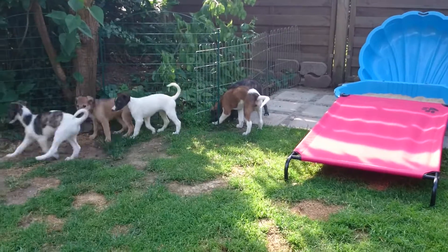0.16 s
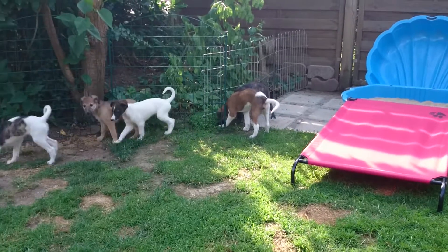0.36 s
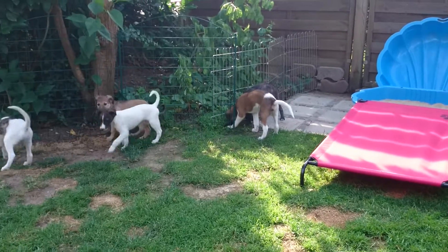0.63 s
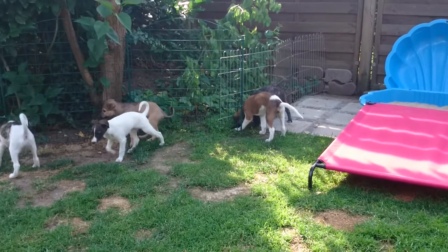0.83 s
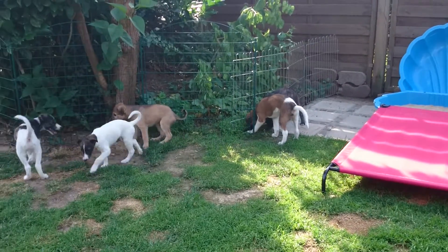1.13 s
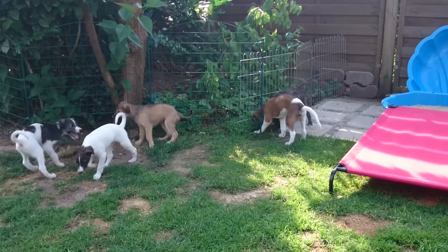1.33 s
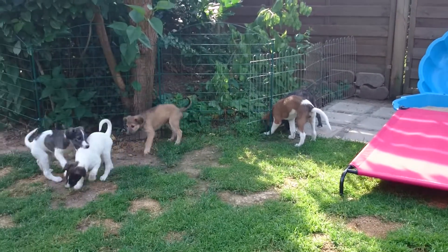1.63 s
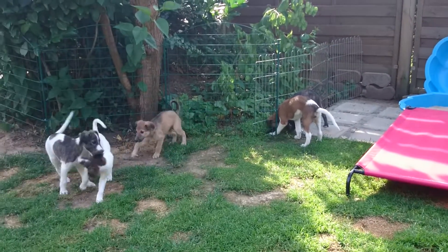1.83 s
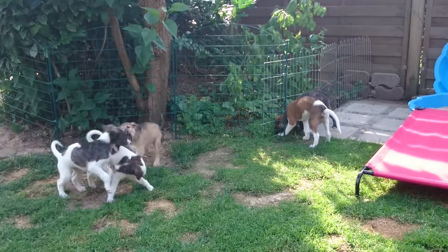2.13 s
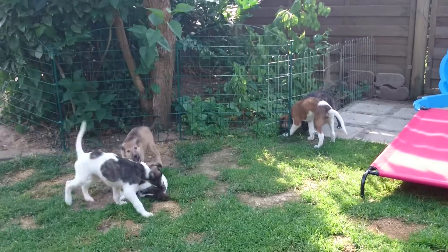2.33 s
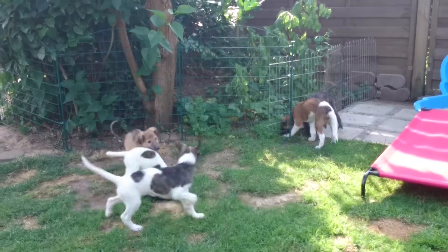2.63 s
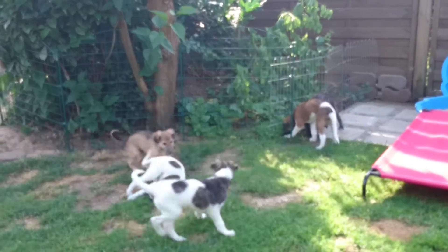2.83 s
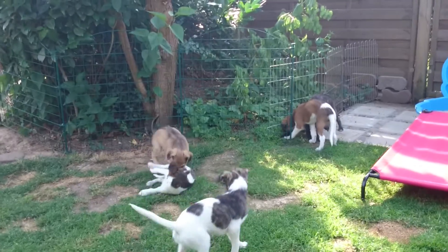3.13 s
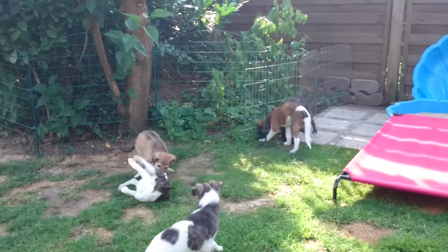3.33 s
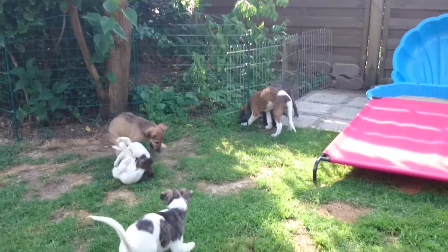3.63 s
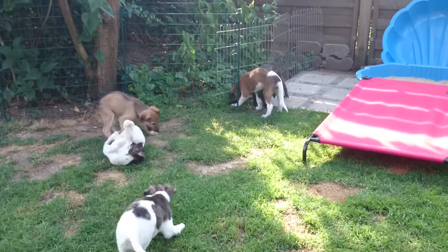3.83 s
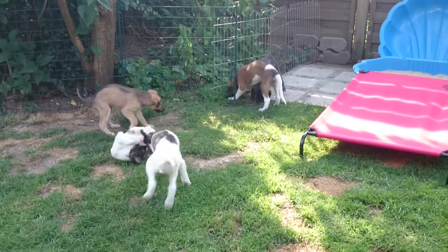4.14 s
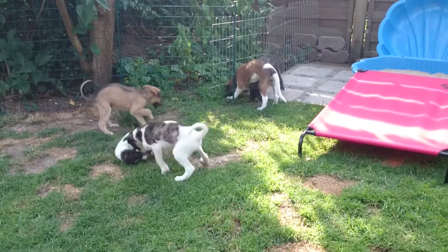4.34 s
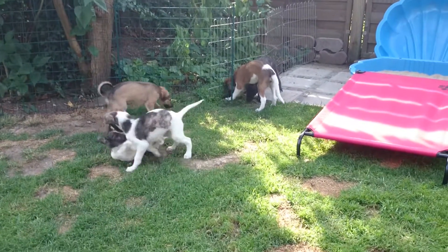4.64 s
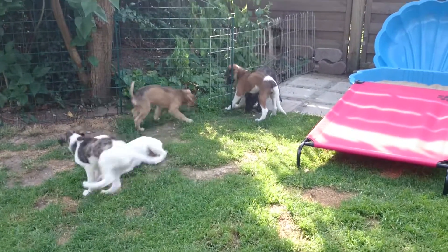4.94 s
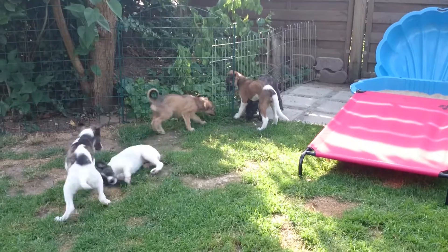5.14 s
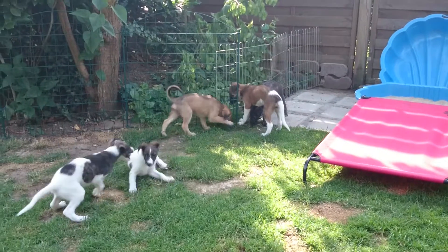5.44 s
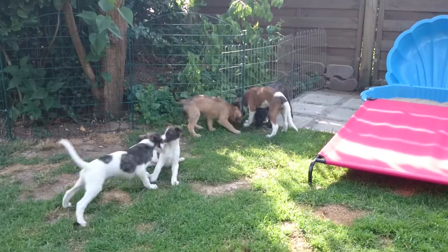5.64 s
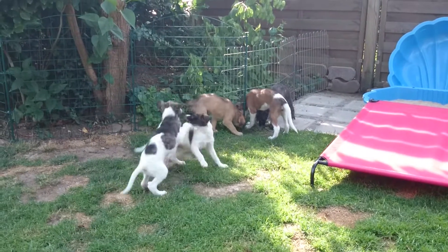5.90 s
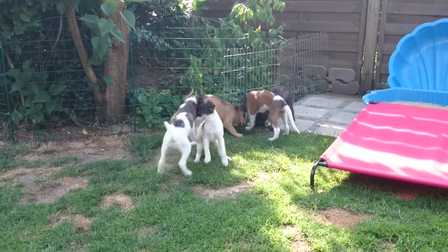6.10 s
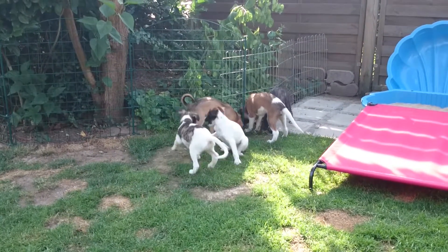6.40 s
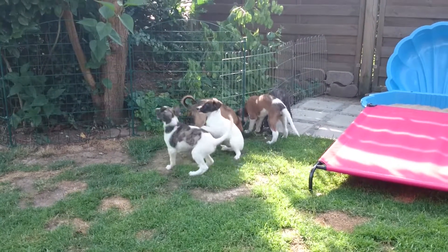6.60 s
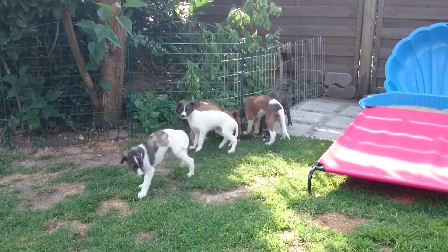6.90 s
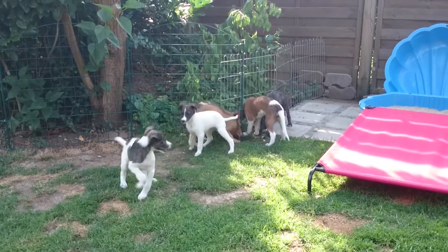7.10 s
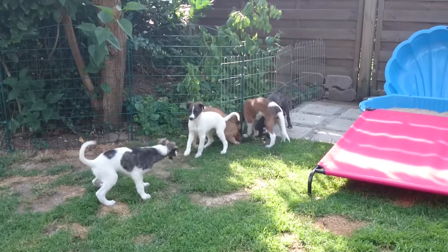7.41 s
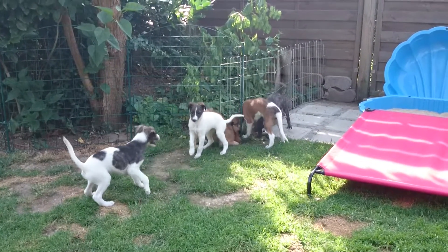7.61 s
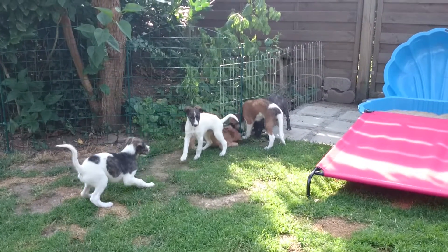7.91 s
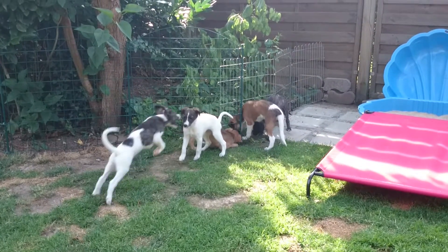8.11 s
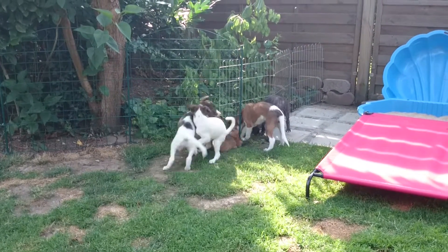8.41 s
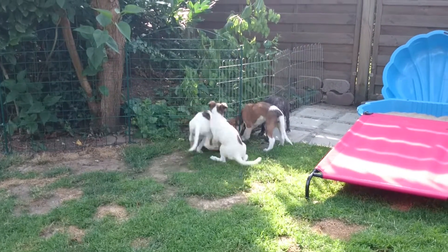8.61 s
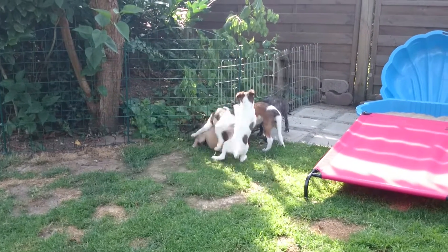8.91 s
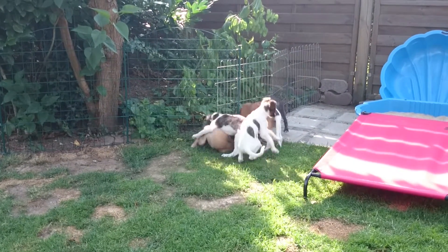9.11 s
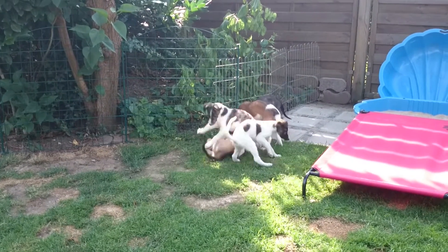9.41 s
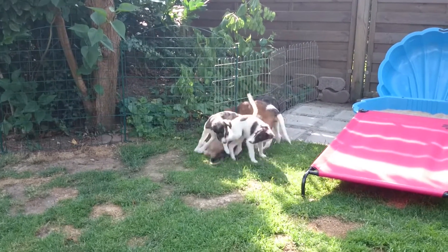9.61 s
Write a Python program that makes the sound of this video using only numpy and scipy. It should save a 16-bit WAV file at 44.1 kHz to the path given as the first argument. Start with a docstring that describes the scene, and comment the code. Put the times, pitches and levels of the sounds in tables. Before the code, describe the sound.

A quiet garden with faint neighbourhood noise and a barely audible wavering hum. Bright sparrow chirps recur, some near and some distant, as young dogs scuffle with small clacks and grassy rustles. One cracking, shrill puppy yelp stands out by far, trailed about a second later by a clipped squeak and a short growl. Thin bird whistles and soft muffled growls close the scene, heard in stereo outdoors with short wall echoes.

```python
"""Puppies tussling on a lawn

Puppies wrestle on a fenced lawn: two shrill yips and a few growls, both voices made of harmonics or pulses plus
breath; small knocks ring as damped sines and paws in the grass crackle as noise grains. Sparrows chirp near and
far and another bird whistles, as gliding tones. A faint wavering hum comes and goes over the noise hush of the
neighbourhood. Two spaced microphones hear animals and grass with a delay for each; fences and walls throw them back."""
import sys
import numpy as np
from scipy import signal
from scipy.fft import rfft, irfft
from scipy.io import wavfile
from scipy.ndimage import uniform_filter1d

SR = 44100
rng = np.random.default_rng(int(sys.argv[2]) if len(sys.argv) > 2 else 0)


def invert_db(x):
    """Field ratio 10**(x/20) for x, a level in decibels (scalar or array-like)."""
    u = np.asarray(x, float) / 20
    return 10 ** u


def log_audio(samples):
    """Write samples as a 16-bit WAV file to the path given in sys.argv[1]."""
    # one column per channel
    frames = np.atleast_2d(samples).T
    # limit to full scale, then quantise
    limited = np.clip(frames, -1, 1)
    pcm = np.round(limited * 32767).astype(np.int16)
    wavfile.write(sys.argv[1], SR, pcm)


N = 429954

# Source levels are those before the microphones' own gains.
# Hush spectrum: pitch_hz, level_db (relative)
HUSH_SPECTRUM = [(12, -39), (20, 0), (38, -5.5), (126, -20), (245, -17), (282, -17), (465, -16), (506, -16),
                 (615, -18), (790, -14.5), (1980, -29), (3870, -30.5), (5550, -38.5), (6940, -44.5),
                 (15600, -51.5)]
# Swell of the hush: start_s, level_db
HUSH_SWELL = [(0.0, -72.5), (2.91, -73.5), (4.72, -67.5), (5.021, -72), (5.65, -70), (9.75, -69)]
# Likeness of the hush at the two sides: pitch_hz, likeness (0-1)
HUSH_LIKENESS = [(30, .4), (130, .8), (290, .8), (640, .45), (1400, .08), (15000, 0)]
# Lean of the hush to one side: pitch_hz, left_minus_right_db
HUSH_LEAN = [(1000, -2), (3200, -4), (5000, -1), (5800, 3), (8000, 1.5), (15000, -0.5)]
# Bursts of paws in grass: start_s (the middle), level_db, spread_s
RUSTLES = [(0.082, -69.5, 0.023), (1.722, -72, 0.043), (3.668, -64, 0.0066), (4.879, -64.5, 0.048),
           (5.628, -64, 0.053), (6.28, -65, .025), (6.93, -69, 0.022), (8.39, -69.5, 0.061),
           (8.619, -74, 0.12), (8.999, -76, 0.048), (9.441, -78, 0.0244)]
# Colour of the grass crackle: pitch_hz, level_db
GRASS_COLOUR = [(300, -3), (1200, -8), (2500, -8), (5000, -2.5), (8000, -28.5), (15000, -26)]
# Knocks of teeth and paws: start_s, level_db, ring_hz
KNOCKS = [(2.4225, -42, 1480), (2.572, -58, 2270), (3.14, -59.5, 2120), (4.274, -58, 542),
          (4.754, -43, 1560), (4.9149, -55.5, 1510), (8.294, -56, 2200), (8.385, -53, 1846)]
# Syllables of the high chirp, the last being an upper voice: start_s, pitch_hz, level_db
HIGH_CHIRP = [
    [(-.012, 4100, -30), (-.002, 4800, -6), (.004, 5050, -1.5), (.016, 5150, -8), (.034, 5150, 0)],
    [(.036, 5100, -18.5), (.043, 5150, 5.5), (.048, 4877, -1.5), (.056, 4400, -2.5), (.098, 3600, -18.5)],
    [(.096, 3700, -14.5), (.117, 4933, 5.5), (.13, 4950, 3), (.154, 3800, -9)],
    [(-.002, 5200, -25), (.008, 5660, -11.5), (.088, 5540, -4), (.096, 5550, -16)],
]
# Syllables of the low chirp: start_s, pitch_hz, level_db
LOW_CHIRP = [
    [(-.018, 3261, -14), (.002, 4650, 0), (.012, 3600, 3.5), (.024, 4225, -0.5), (.042, 3775, -28)],
    [(.024, 2594, -15.5), (.042, 3600, 1.5), (.052, 3430, 3), (.07, 2960, -17)],
]
# Times the high chirp is sung: start_s, direct_sound_db, level_db, closing_stress_db
HIGH_CALLS = [(.256, 8, -62, 4), (1.096, 5.5, -57, 0.5), (3.22, 6, -63.5, 5.5), (3.98, 2.5, -60.5, -0.5),
              (6.311, 5, -49.5, -4), (8.043, 4.5, -59.5, -1), (9.682, 2, -65.5, 0), (2.8, -18, -77, -4)]
# Times the low chirp is sung: start_s, direct_sound_db, level_db, closing_stress_db
LOW_CALLS = [(2.227, 5.5, -61.5, 0.5), (4.8, 8, -62.5, 1.5), (5.586, 6, -62, -0.5), (7.196, 7, -62.5, 1.5),
             (.505, 16, -99, 11.5), (1.369, 9, -87, -7), (1.68, -9, -87, -8), (1.975, -2, -82.5, -15),
             (2.04, 10, -94, 12), (2.122, -4, -82, -5), (6.73, -3, -79, -0.5), (9.56, -7, -75, -8)]
# What throat and beak pass, one row a chirp: low_edge_hz, high_edge_hz
BEAK_BANDS = [(3700, 5950), (2500, 7200)]
# Hum tones: start_s, length_s, pitch_hz, level_db
HUMS = [(2.15, 0.46, 506, -77), (3.12, 1.97, 508.5, -71.5), (5.2, .55, 513, -77.5),
        (6.05, 0.61, 512.4, -77), (7.0, 0.36, 517, -76), (8.8, 0.56, 570.5, -73.5)]
# One curve a yip: start_s, pitch_hz, level_db, flutter_depth (0-1)
YIPS = [
    [(4.375, 994, -79, 0.1), (4.405, 1240, -68, 0.08), (4.45, 1465, -55.5, 0.08),
     (4.462, 1343, -46.5, 0.14), (4.492, 1331, -31.5, 0.08), (4.4955, 1486, -18.5, .05),
     (4.52, 1567, -16.5, 0), (4.537, 1538, -20.5, 0.3), (4.558, 1661, -18, 0.1), (4.57, 1704, -25, .05),
     (4.592, 1661, -30, .05), (4.605, 1520, -50, .05)],
    [(5.828, 1360, -60, 0), (5.837, 1194, -51, 0.08), (5.843, 1370, -29.5, 0.02), (5.86, 1451, -27.5, 0),
     (5.87, 1405, -46.5, 0.08)],
]
# Throat on harmonics 2 and 3: pitch_hz, level_db (against the fundamental)
THROAT = [(2000, -1.5), (2650, -26.5), (3000, -21), (3350, -10), (3800, -8.5), (4200, -14.5), (4700, -10),
          (5050, -23.5)]
# Thin second whistle of the larynx: start_s, length_s, first_hz, last_hz, level_db
SQUEAKS = [(4.562, 0.015, 6990, 6000, -54.5), (4.572, .03, 6005, 5930, -46.5),
           (4.574, .036, 7440, 7570, -52.5), (4.603, .016, 7570, 6900, -51),
           (4.594, .021, 4414, 3850, -46.5), (5.862, .025, 7500, 7300, -74)]
# Cracks of the voice into a higher register: start_s, level_db
VOICE_BREAKS = [(4.478, -51.5), (4.492, -42), (4.4934, -36.5), (5.84, -55)]
# Growls: start_s, length_s, effort_db, mouth_brightness_db, mouth_resonance_hz (at the start)
GROWLS = [(6.121, .35, -61.5, -2, 1777), (8.562, 0.19, -58, -15, 1860), (8.921, 0.18, -69, -23, 1523),
          (9.414, 0.049, -80, 8, 1925)]
# Chest resonances: pitch_hz, width_hz, level_db
CHEST = [(276, 153, 5), (513, 137, -10)]
# Mouth resonances: factor (on the moving mouth resonance), width_hz, level_db
MOUTH = [(.5, 500, -13), (.76, 300, -6), (1.04, 200, 0), (1.2, 260, -8), (1.6, 700, -15), (2.05, 700, -13),
         (2.6, 900, -19)]
# Whistled notes: start_s, length_s, first_hz, last_hz, level_db
WHISTLES = [(7.082, 0.05, 3260, 3620, -76), (7.136, 0.064, 3210, 3260, -62.5),
            (7.261, 0.081, 3420, 3310, -68), (7.528, 0.039, 3290, 3600, -68.5),
            (7.544, 0.051, 3214, 3184, -65), (7.7, 0.095, 2917, 2980, -66.5), (8.005, .06, 3310, 3200, -66),
            (8.037, 0.066, 3100, 3010, -68.5), (8.189, 0.13, 2980, 2937, -65.5),
            (8.493, 0.14, 3325, 2910, -62), (8.665, .13, 3180, 2797, -67.5)]
# Decay of the yard's echoes: pitch_hz, t60_s
YARD_DECAY = [(300, 0.047), (1500, 0.38), (3000, 0.36), (4200, .45), (5000, 0.25), (6500, 0.36),
              (12000, 0.051)]
# Unlike colour of the two microphone ports: pitch_hz, left_minus_right_db
PORT_COLOUR = [(40, 0), (350, 6), (1500, 5.5), (3200, 5), (3900, 9), (4400, 2.5), (4800, 5), (5800, -8.5),
               (8000, 0), (15000, 0.5)]
# Phase between the ports: pitch_hz, left_lead_rad
PORT_PHASE = [(2500, 0), (3300, -.8), (4300, .9), (5200, .6), (6500, .4), (7600, 2.4), (10300, 2.6),
              (12400, 1.9)]


def evened(x):
    """Scales to rms 1."""
    return x / np.sqrt(np.mean(x ** 2) + 1e-20)


def read(points, hz):
    """Looks up a spectrum on a log frequency axis."""
    f, value = np.transpose(points)
    return np.interp(np.log(hz + 1), np.log(f + 1), value)


def add(mix, s, sound):
    """Mixes a sound in at time s."""
    part = mix[..., round(s * SR):][..., :sound.shape[-1]]
    part += sound[..., :part.shape[-1]]


def spread(rows):
    """Joins curve rows by straight lines, one value a sample."""
    s, *columns = np.transpose(rows)
    t = np.arange(s[0], s[-1], 1 / SR)
    return s[0], [np.interp(t, s, c) for c in columns]


def wander(count, size):
    """Smooth chance of rms 1: noise averaged twice over size samples."""
    smooth = uniform_filter1d(rng.standard_normal(count), size)
    return evened(uniform_filter1d(smooth, size))


def resonate(x, hz, width):
    """A resonance of gain 1 that follows the curve hz: shift down, smooth, shift back up."""
    turn = np.exp(2j * np.pi * np.cumsum(hz * np.ones(len(x))) / SR)
    r = np.exp(-np.pi * width / SR)
    return 2 * (turn * signal.lfilter([1 - r], [1, -r], x / turn)).real


def resonate_twice(x, hz, width, second_width):
    """Two resonances in a row give steeper skirts."""
    return resonate(resonate(x, hz, width), hz, second_width)


def note(s, length, first_hz, last_hz, db, rise_s, fade_db):
    """Curve rows of a gliding note: a quick rise, a slow change of level, a fall as quick as the rise."""
    share = np.array([0, rise_s / length, 1 - rise_s / length, 1])
    level_db = db + np.array([-15, 0, fade_db, fade_db - 15])
    return np.transpose([s + share * length, first_hz + share * (last_hz - first_hz), level_db])


def tone(rows, wobble, overtone_db, trill=0, trill_hz=0):
    """A near sine with unsteady pitch and a weak octave; a fast trill adds side lines."""
    s, (hz, db) = spread(rows)
    angle = 2 * np.pi * np.cumsum(hz * (1 + wobble * wander(len(hz), size=60))) / SR
    trill_rate = trill_hz * (1 + 0.013 * wander(len(hz), size=200))
    angle += trill * np.sin(2 * np.pi * np.cumsum(trill_rate) / SR)
    wave = np.sin(angle) + invert_db(overtone_db) * np.sin(2 * angle)
    return s, np.sqrt(2) * invert_db(db) * wave * signal.windows.tukey(len(hz), .15)


def heard(x, lag, pan_db, near_db, wet_db, onset_s, tilt_db=0):
    """Direct sound reaches the left microphone lag samples late; then sparse echoes, other ones at each side."""
    count = SR // 2
    taps = np.zeros((2, count))
    at = np.arange(0, count - 20, 20) + rng.integers(0, 20, (2, (count - 1) // 20))
    np.put_along_axis(taps, at, rng.choice([-1., 1.], at.shape), 1)
    hz, t, z = signal.stft(taps, SR, nperseg=256)
    decay_db = -60 * t / read(YARD_DECAY, hz)[:, None]
    colour_db = tilt_db * np.log2(1 + hz / 1000)[:, None]
    tail = signal.istft(z * invert_db(decay_db + colour_db), SR, nperseg=256)[1][:, :count]
    tail *= 1 - np.exp(-(np.arange(count) / SR / onset_s) ** 2)  # echoes set in gradually
    tail *= invert_db(wet_db) / np.linalg.norm(tail[0])
    half_lags = np.array([[lag / 2], [-lag / 2]])
    tail[:, :64] += invert_db(near_db) * np.sinc(np.arange(64) - 32 - half_lags)  # direct sound
    sides = signal.fftconvolve(x[None], tail, axes=1)[:, 32:]
    return sides * invert_db(pan_db * np.array([[.5], [-.5]]))


def hush():
    """Distant traffic, leaves and microphone hiss: noise with drifting patches."""
    frames = N // 256 + 5
    hz = np.fft.rfftfreq(1024, 1 / SR)
    a, b, c, d, patches = rng.standard_normal((frames, 513, 5)).T
    patches = uniform_filter1d(patches, size=14, axis=0)
    patches_db = evened(uniform_filter1d(patches, size=20, axis=1))
    same = np.clip(read(HUSH_LIKENESS, hz), -1, 1)[:, None]
    left = a + 1j * b
    right = same * left + np.sqrt(1 - same ** 2) * (c + 1j * d)
    lean_db = read(HUSH_LEAN, hz)[:, None] * np.array([.5, -.5])[:, None, None]
    s, db = np.transpose(HUSH_SWELL)
    swell_db = np.interp(np.arange(frames) * 256 / SR, s, db)
    outdoor = np.clip(1.2 - hz / 7000, 0, 1)[:, None]  # the hiss at the top stays steady
    moving_db = outdoor * (swell_db - db.mean() + patches_db)
    level_db = read(HUSH_SPECTRUM, hz)[:, None] + lean_db + moving_db + db.mean() + 56
    z = np.array([left, right]) * invert_db(level_db)
    return signal.istft(z, nperseg=1024, noverlap=768)[1][:, :N] / 256


def tussle():
    """Knocks of teeth and paws ring briefly; grass crackles in dense grains."""
    out, t = np.zeros(N), np.arange(2000) / SR
    for s, db, hz in KNOCKS:
        ring = np.sin(2 * np.pi * hz * t) + .15 * np.sin(2 * np.pi * 2.6 * hz * t)
        ring *= np.exp(-t * hz / 1.8) * (1 - np.exp(-t / 0.00045))  # a few cycles, soft start
        push = 0.49 * np.sin(2 * np.pi * 380 * t) * np.exp(-t / 0.0035)
        scrape = 0.13 * rng.standard_normal(len(t)) * np.exp(-t / 0.0015)
        add(out, s, invert_db(db) * (2.9 * ring + push + scrape))
    grain_level = invert_db(3.5 * np.minimum(rng.exponential(1, N), 5))
    grains = rng.standard_normal(N) * grain_level * (rng.random(N) < 5000 / SR)  # about 5000 a second
    colour = invert_db(read(GRASS_COLOUR, np.fft.rfftfreq(N, 1 / SR)))
    grass = evened(irfft(rfft(grains) * colour, N))
    now = np.arange(N) / SR
    out += grass * sum(invert_db(db) * np.exp(-.5 * ((now - s) / w) ** 2) for s, db, w in RUSTLES)
    return heard(out, lag=-2, pan_db=-2, near_db=0, wet_db=-15, onset_s=.003)


def sparrow(chirp, calls, closing, beak_hz, trill, overtone_db, wet_db):
    """One chirp shape of trilled gliding tones sung again and again, banded by the beak; the walls answer."""
    out = np.zeros((2, N))
    beak = signal.butter(6, beak_hz, "bandpass", fs=SR, output="sos")
    for s, near_db, level_db, stress_db in calls:
        call = np.zeros(SR // 4)
        for k, rows in enumerate(chirp):
            db = level_db + stress_db * (k == closing)
            start, voice = tone(rows, wobble=0.025, overtone_db=overtone_db, trill=trill, trill_hz=706.5)
            throb = invert_db(2 * wander(len(voice), size=110))  # uneven air pressure
            add(call, start + .02, invert_db(db) * throb * voice)  # room for the lead-in before zero
        spray = 0.13 * call * wander(len(call), size=14)  # turbulence frays the notes
        song = signal.sosfilt(beak, call) + spray
        add(out, s - .02, heard(song, 8.5, 0, near_db, wet_db, onset_s=0.01))
    return out


def hum():
    """Faint wavering low tones, alike at both sides."""
    out = np.zeros(N)
    for s, length, hz, db in HUMS:
        rows = note(s, length, hz, hz, db, rise_s=0.1025, fade_db=1)
        s, wave = tone(rows, wobble=0.0077, overtone_db=-30)
        add(out, s, wave * invert_db(4 * wander(len(wave), size=3000)))  # wavers by 4 dB rms
    return np.array([out, out])


def yip(rows, shrill_db):
    """A nearly pure high voice; a slower second vibration makes it flutter and lets puffs of air through."""
    upper_db = [-30, -40.5, -54.5, -49, -52.5, -63.5]  # harmonics 4 to 9, before shrillness
    flutter_hz = 200.3
    s, (hz, db, depth) = spread(rows)
    count = len(hz)
    angle = 2 * np.pi * np.cumsum(hz * (1 + .003 * wander(count, size=40))) / SR
    beat = np.sin(2 * np.pi * np.cumsum(flutter_hz * (1 + 0.072 * wander(count, size=300))) / SR)
    angle += 1.2 * depth * beat
    weak = 1 + np.clip((-40 - db) / 8, 0, 3)  # a faint voice is breathier
    lift_db = 2.5 * (weak - 1)  # and richer in low overtones
    low_db = [read(THROAT, k * hz) + lift_db for k in (2, 3)]
    levels_db = [0, *low_db, *np.add(upper_db, shrill_db)]
    voice = 0
    for k, harmonic_db in enumerate(levels_db):
        fray_db = 1.2 * k * np.sqrt(weak) * wander(count, size=40)  # higher harmonics are less steady
        voice = voice + invert_db(harmonic_db) * invert_db(np.minimum(fray_db, 5)) * np.sin((k + 1) * angle)
    voice = voice * (1 + depth * beat)
    air = evened(resonate_twice(rng.standard_normal(count), 2800, 1700, 3500))
    air *= (0.39 + 3 * depth) * (1 + beat) * weak
    hiss = evened(resonate_twice(rng.standard_normal(count), 11000, 2200, 2600))
    sound = invert_db(db) * (np.sqrt(2) * voice + invert_db(-24.5) * air)
    sound += invert_db(-55 + shrill_db + .6 * db) * hiss  # the hiss follows the effort less than the voice does
    return s, sound * signal.windows.tukey(count, .03)


def squeaks():
    """The larynx whistles thinly, and short noise bursts mark the voice cracking into a higher register."""
    out = np.zeros(N)
    for row in SQUEAKS:
        add(out, *tone(note(*row, rise_s=.005, fade_db=-6), wobble=.004, overtone_db=-32.5))
    band = signal.butter(6, (1200, 6000), "bandpass", fs=SR, output="sos")
    for s, db in VOICE_BREAKS:
        crack = signal.sosfilt(band, rng.standard_normal(220) * np.hanning(220))
        add(out, s, invert_db(db) * evened(crack))
    return out


def yips():
    """Both yips and their squeaks in the yard; echoes are duller, as the treble beams forward."""
    lag, tilt_db = -2.5, -5.5  # samples; echo tilt factor
    out = np.zeros((2, N))
    for rows, wet_db, shrill_db in zip(YIPS, [-19, -32], [0.5, -19.5]):
        s, sound = yip(rows, shrill_db)
        add(out, s, heard(sound, lag, pan_db=1.0, near_db=3.5, wet_db=wet_db, onset_s=0.0047, tilt_db=tilt_db))
    thin = heard(squeaks(), lag, pan_db=1.0, near_db=8.0, wet_db=-25, onset_s=0.015, tilt_db=tilt_db)
    return out + thin[:, :N]


def growls():
    """Uneven slow pulses of the folds, each with a puff of air, ring the chest and the mouth."""
    pulses_hz, rise_s, sag_db, ends_db = 123.6, 0.029, -0.5, -5
    out = np.zeros(N)
    for s, length, effort_db, bright_db, mouth_hz in GROWLS:
        t = np.arange(0, length, 1 / SR)
        count = len(t)
        shape_s = [0, rise_s, 0.49 * length, length]
        db = effort_db + np.interp(t, shape_s, [ends_db, 0, sag_db, sag_db + ends_db])
        # the jaw opens early, wider with effort above a quiet growl, then settles
        gape = np.exp(-((t - 0.026) / 0.028) ** 2)
        bright_db = bright_db + 2 * max(effort_db + 66.5, 0) * gape
        hz = mouth_hz + 900 * t  # the mouth resonance rises 900 Hz a second
        turns = np.cumsum(pulses_hz * (1 + 0.38 * wander(count, size=200))) / SR
        db = db + 3.5 * wander(count, size=350)  # the throat catches and lets go
        pulses = np.diff(np.floor(turns), prepend=0) * invert_db(2.5 * rng.standard_normal(count))
        puffs = evened(np.exp(-(turns % 1) / 2.3) * rng.standard_normal(count))
        drive = .55 * evened(pulses) + puffs
        breath = .25 * evened(pulses) + puffs  # the mouth carries mostly air
        chest = sum(invert_db(d) * resonate_twice(drive, f, w, 2 * w) for f, w, d in CHEST)
        mouth = np.zeros(count)
        for k, (f, w, d) in enumerate(MOUTH):
            mouth += (-1) ** k * invert_db(d) * resonate_twice(breath, f * hz, w, 2 * w)
        growl = evened(chest) + invert_db(bright_db) * evened(mouth)
        add(out, s, invert_db(db) * growl * signal.windows.tukey(count, .08))
    return heard(out, lag=-1, pan_db=-1, near_db=6.5, wet_db=1.0, onset_s=0.0016)


def whistler():
    """Gliding whistled notes with a flickering level, from farther off."""
    out = np.zeros(N)
    for row in WHISTLES:
        s, wave = tone(note(*row, rise_s=0.0072, fade_db=-8.5), wobble=.017, overtone_db=-40)
        add(out, s, wave * invert_db(4 * wander(len(wave), size=300)))  # flickers by 4 dB rms
    return heard(out, lag=9, pan_db=-1.0, near_db=5.5, wet_db=1.5, onset_s=0.016)


def scene():
    """Puppies, birds and the quiet neighbourhood."""
    birds = sparrow(HIGH_CHIRP, HIGH_CALLS, 2, BEAK_BANDS[0], trill=.5, overtone_db=-34, wet_db=-3)
    birds += sparrow(LOW_CHIRP, LOW_CALLS, 1, BEAK_BANDS[1], trill=.3, overtone_db=-26, wet_db=0)
    layers = (hush(), tussle(), birds, hum(), yips(), growls(), whistler())
    return sum(x[:, :N] for x in layers)


def band_limit(x):
    """A steep low-pass at the top of the band."""
    return signal.sosfilt(signal.butter(12, 15710, fs=SR, output="sos"), x)


def record(dry):
    """The two microphone ports colour the sound unlike each other in level and phase."""
    hz = np.fft.rfftfreq(N, 1 / SR)
    side = np.array([[.5], [-.5]])
    ports = invert_db(read(PORT_COLOUR, hz) * side) * np.exp(1j * read(PORT_PHASE, hz) * side)
    mix = irfft(rfft(dry) * ports, N)
    return band_limit(mix)


dry = scene()
out = record(dry)
log_audio(out)
```